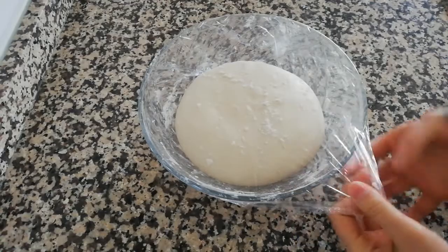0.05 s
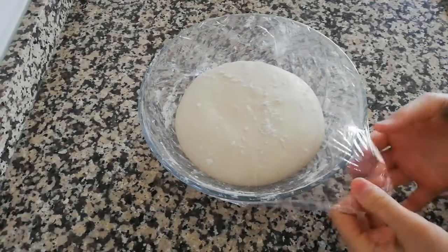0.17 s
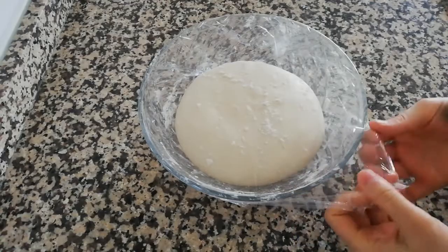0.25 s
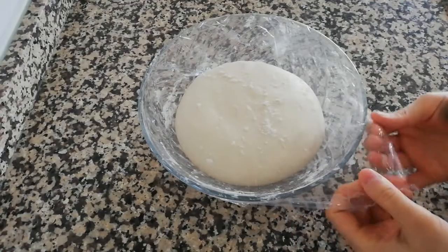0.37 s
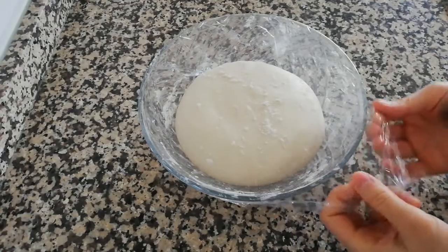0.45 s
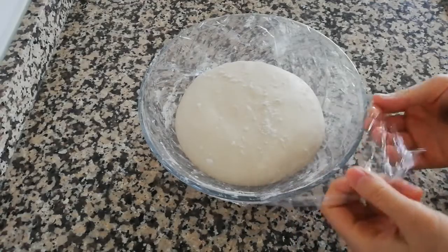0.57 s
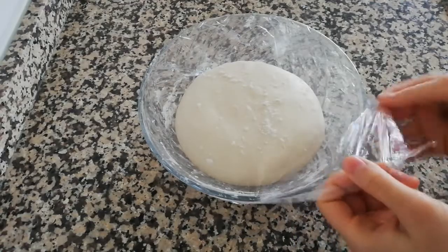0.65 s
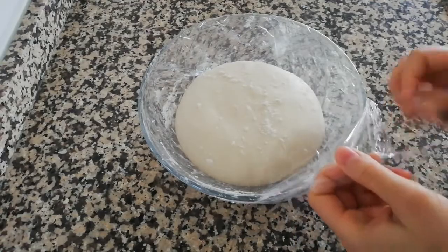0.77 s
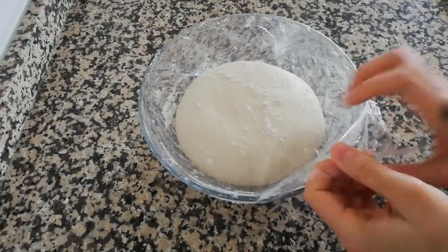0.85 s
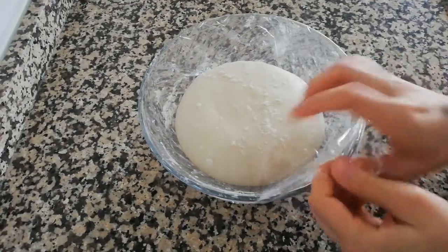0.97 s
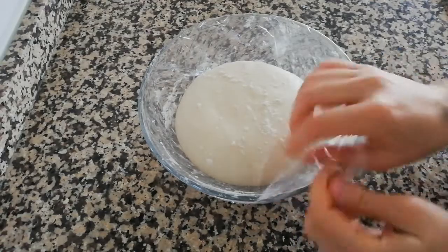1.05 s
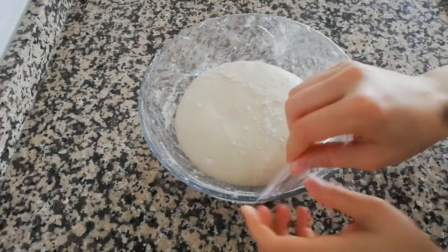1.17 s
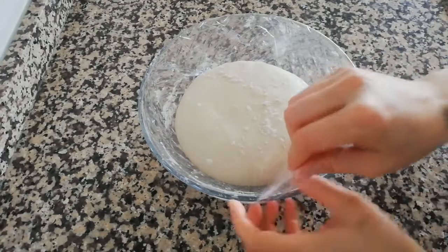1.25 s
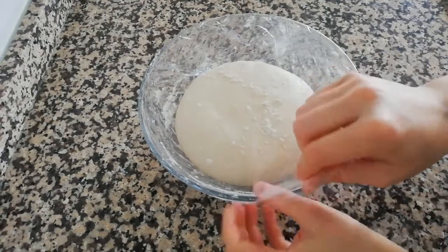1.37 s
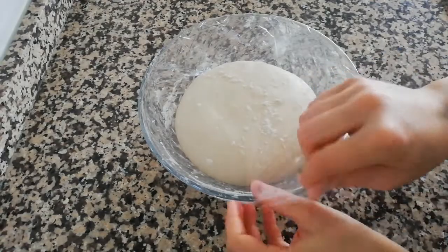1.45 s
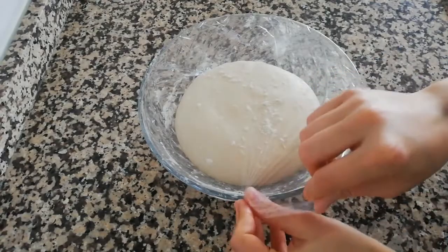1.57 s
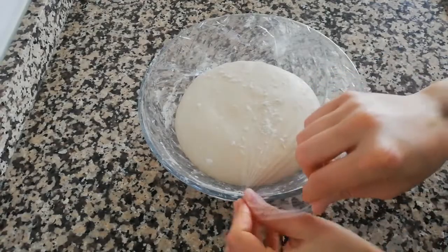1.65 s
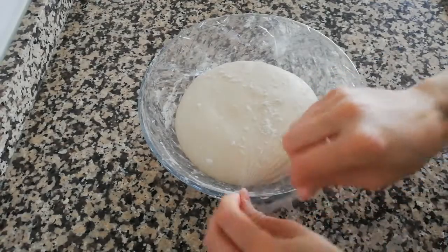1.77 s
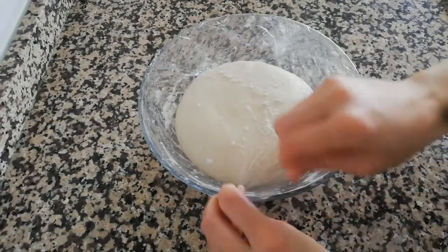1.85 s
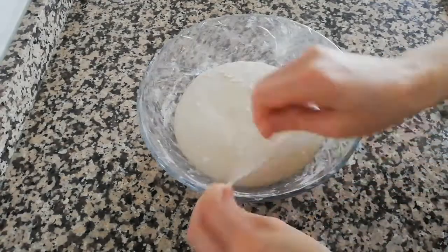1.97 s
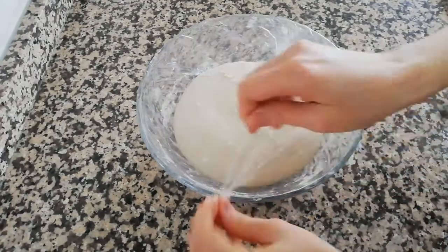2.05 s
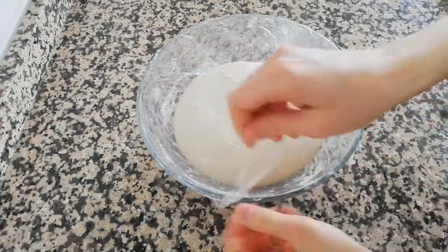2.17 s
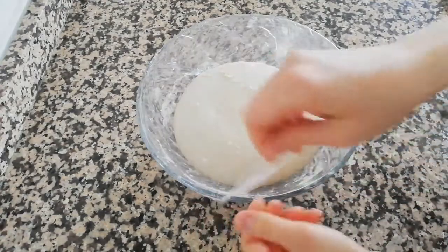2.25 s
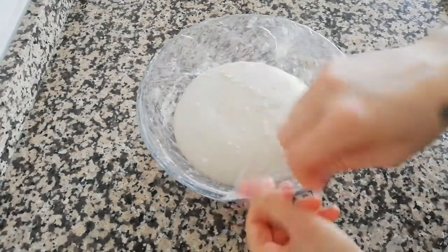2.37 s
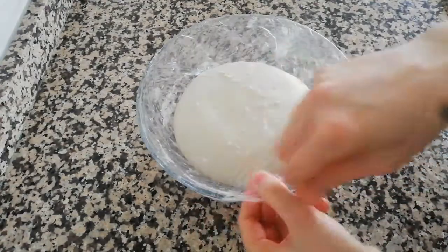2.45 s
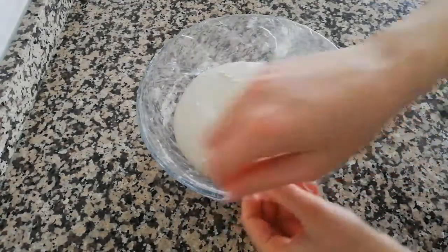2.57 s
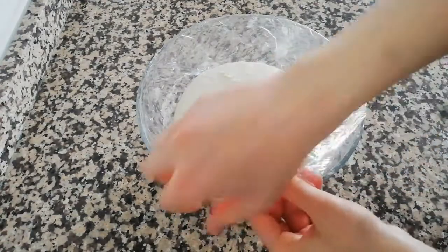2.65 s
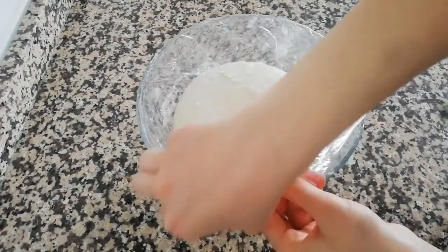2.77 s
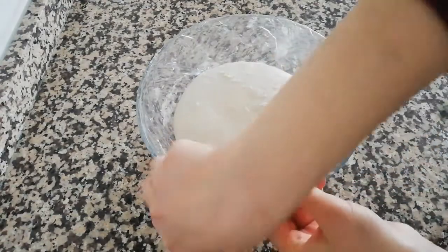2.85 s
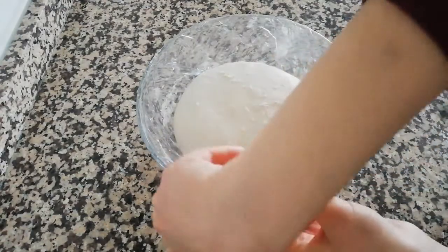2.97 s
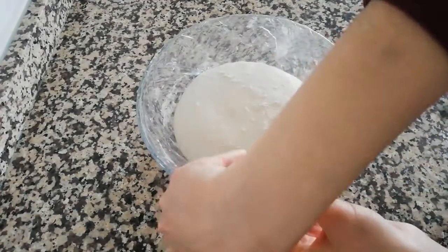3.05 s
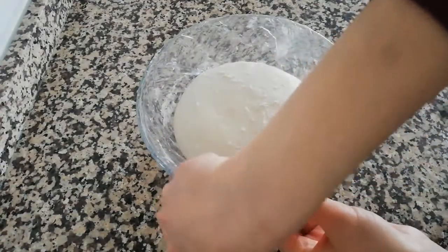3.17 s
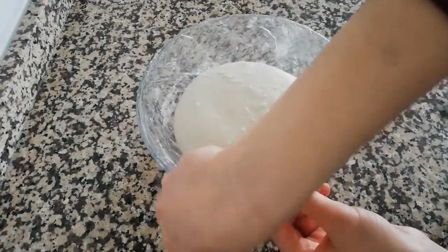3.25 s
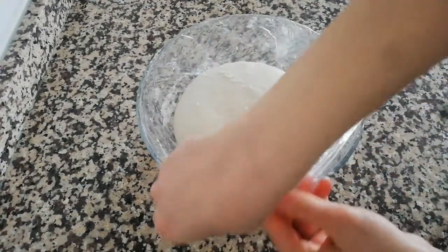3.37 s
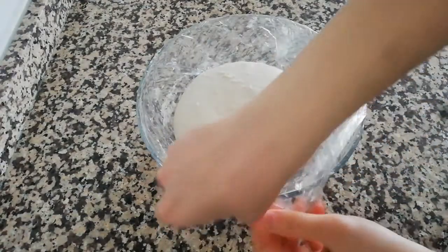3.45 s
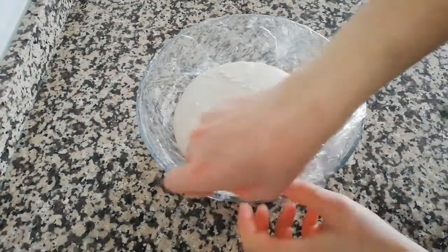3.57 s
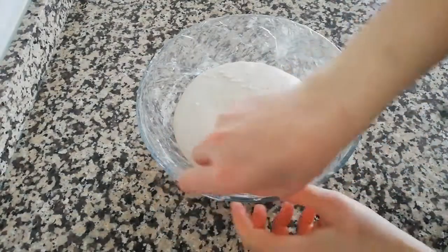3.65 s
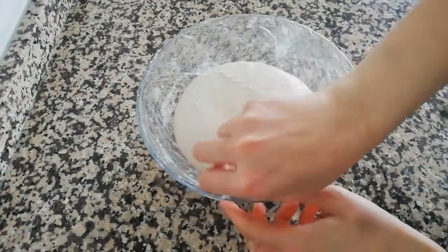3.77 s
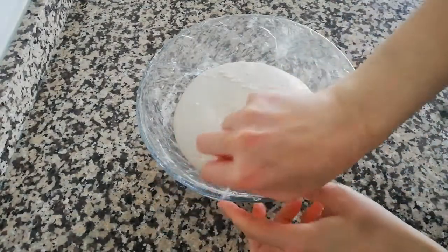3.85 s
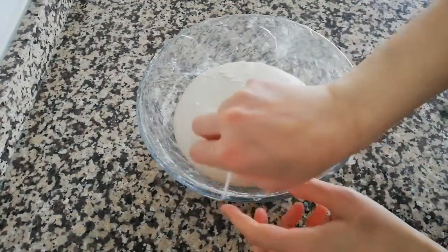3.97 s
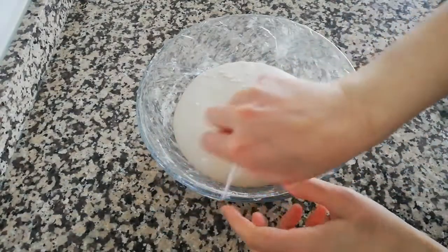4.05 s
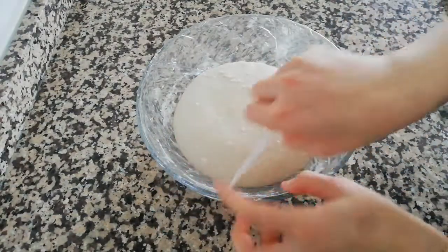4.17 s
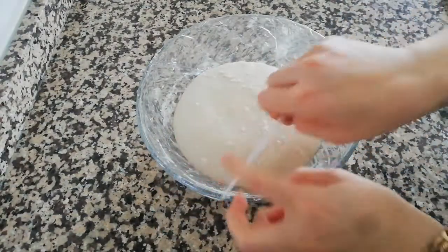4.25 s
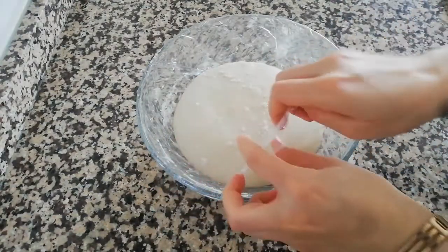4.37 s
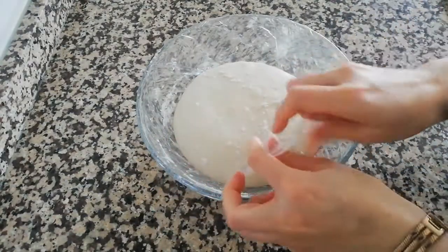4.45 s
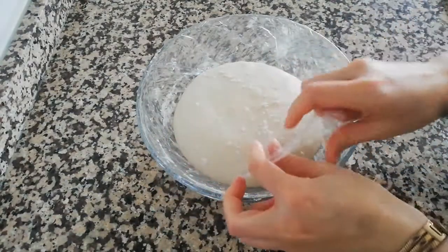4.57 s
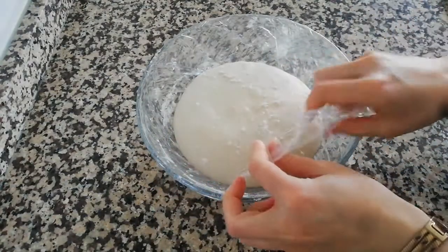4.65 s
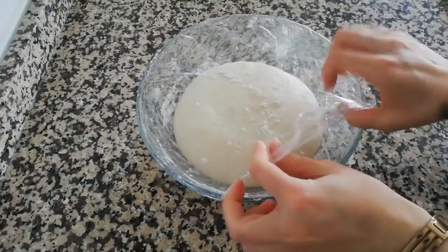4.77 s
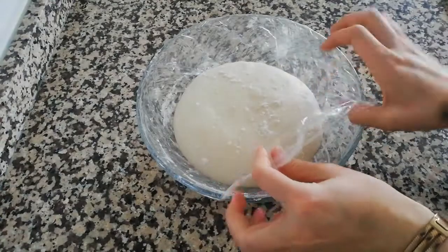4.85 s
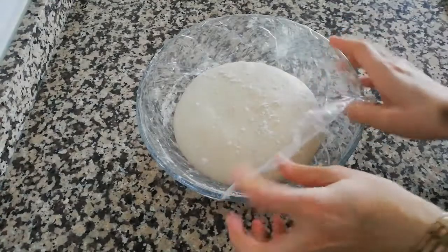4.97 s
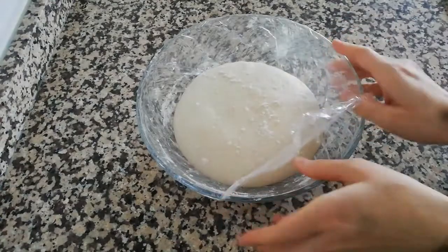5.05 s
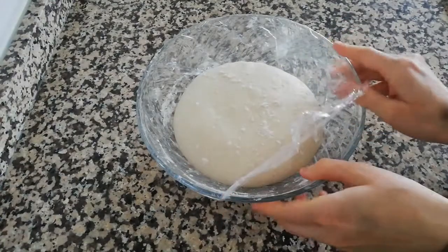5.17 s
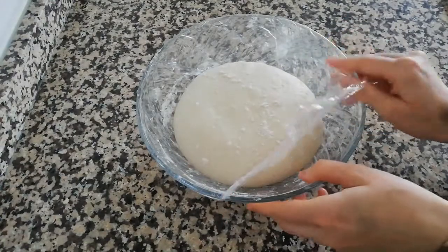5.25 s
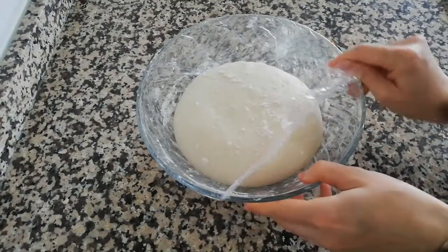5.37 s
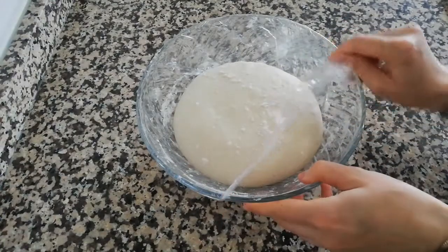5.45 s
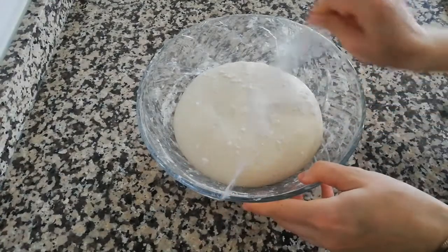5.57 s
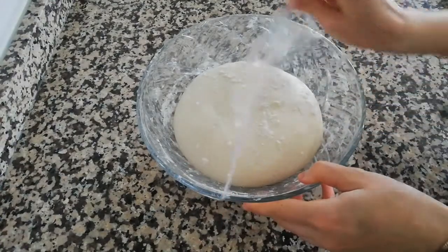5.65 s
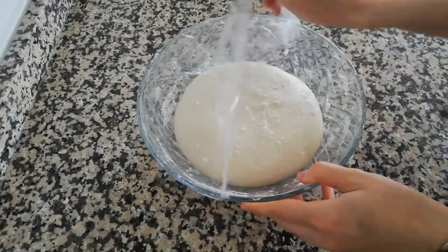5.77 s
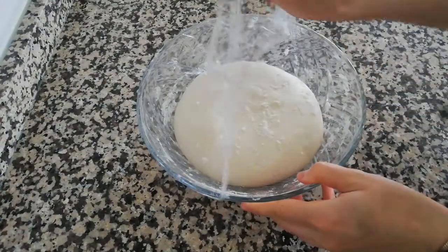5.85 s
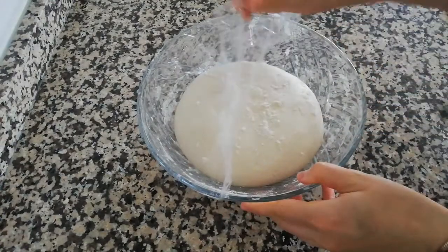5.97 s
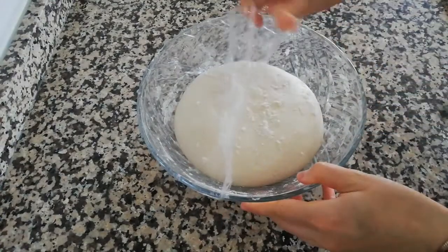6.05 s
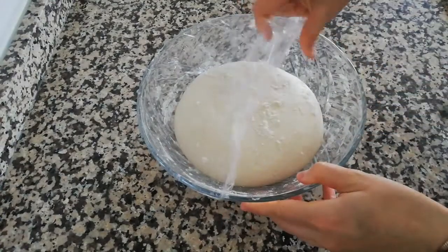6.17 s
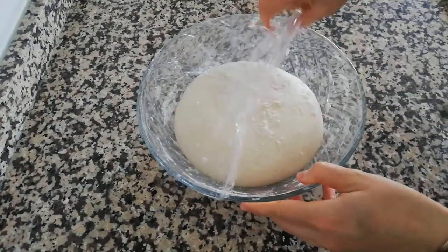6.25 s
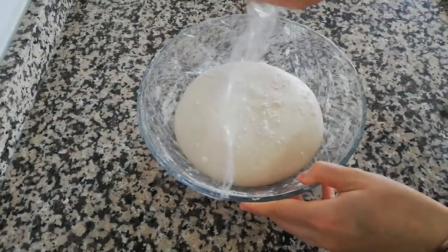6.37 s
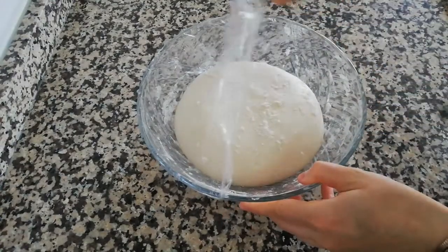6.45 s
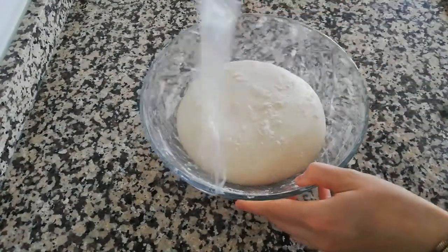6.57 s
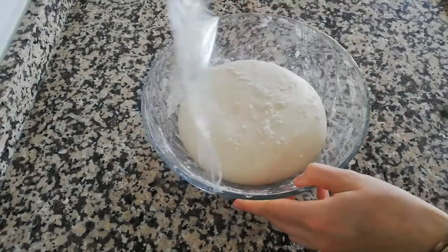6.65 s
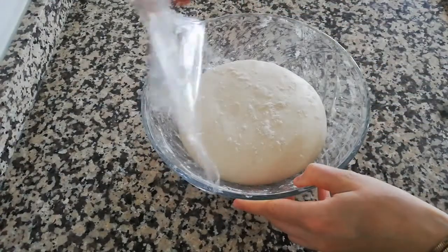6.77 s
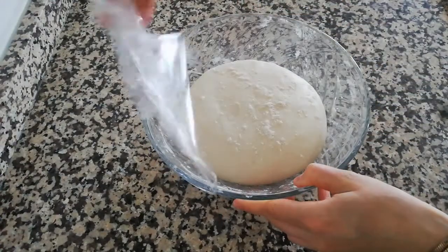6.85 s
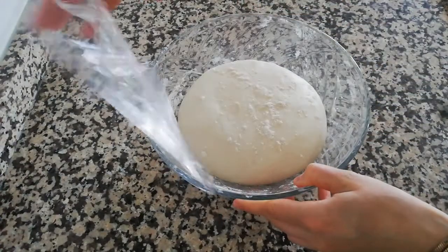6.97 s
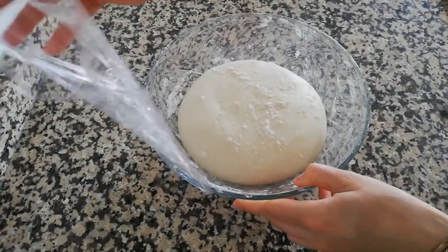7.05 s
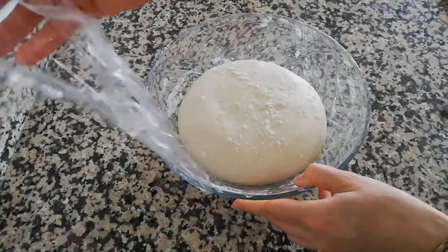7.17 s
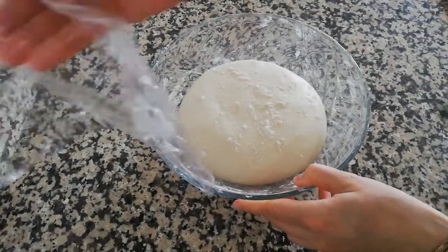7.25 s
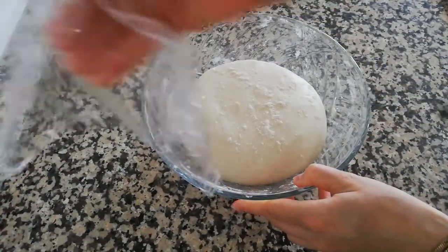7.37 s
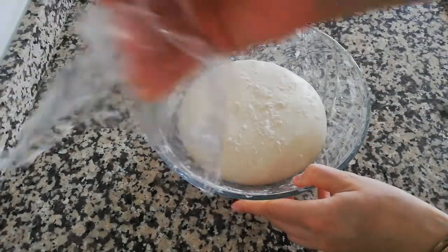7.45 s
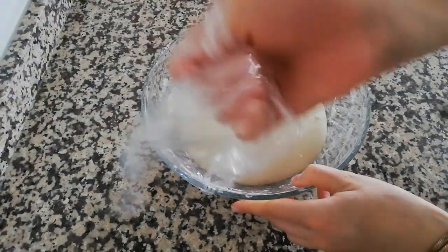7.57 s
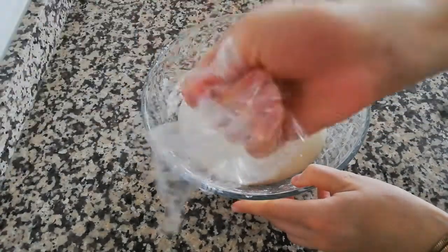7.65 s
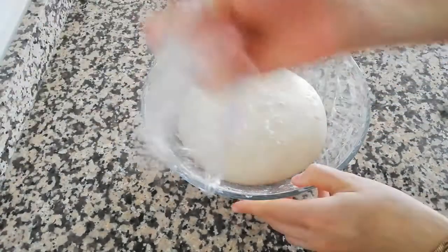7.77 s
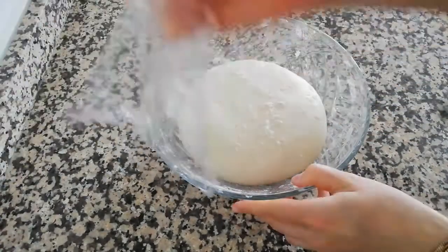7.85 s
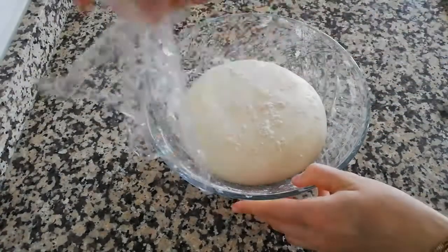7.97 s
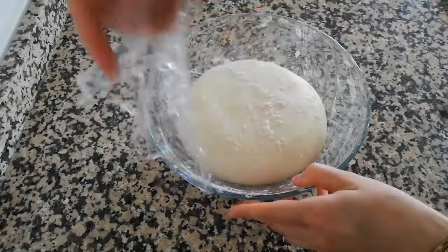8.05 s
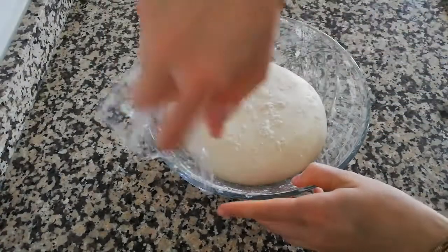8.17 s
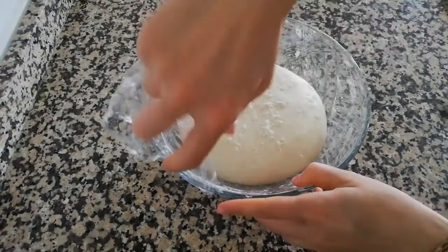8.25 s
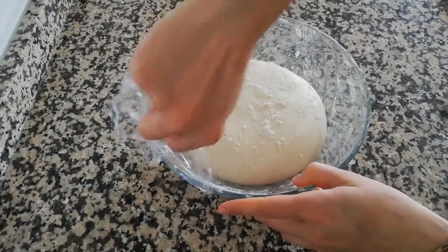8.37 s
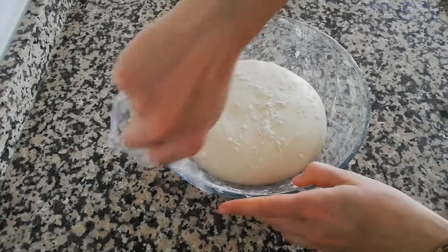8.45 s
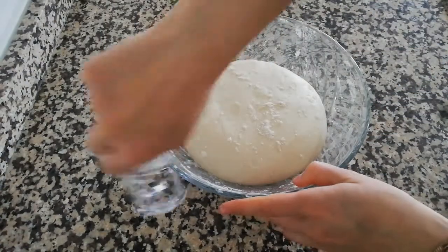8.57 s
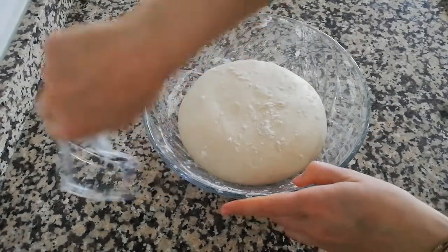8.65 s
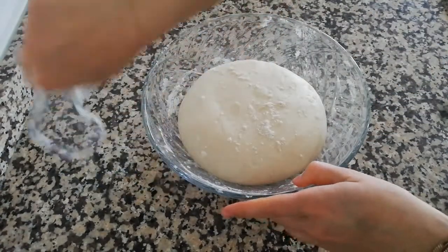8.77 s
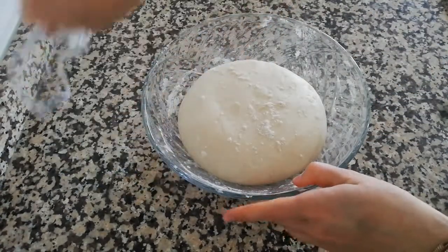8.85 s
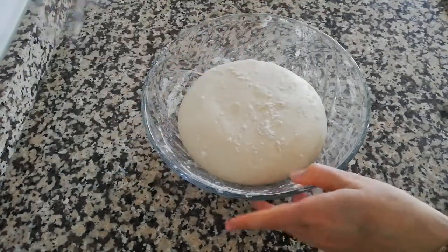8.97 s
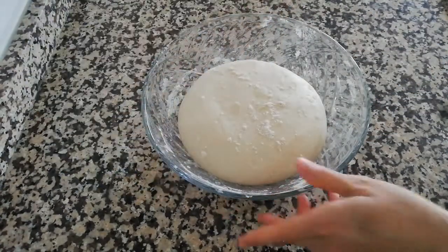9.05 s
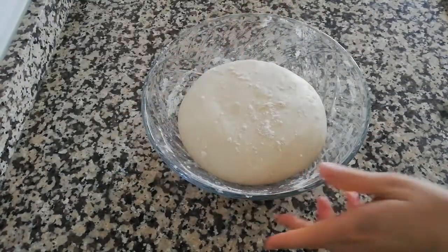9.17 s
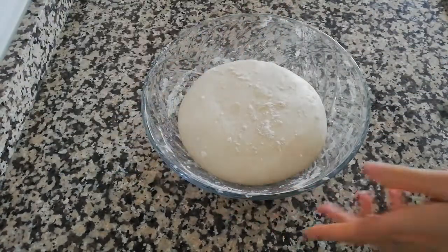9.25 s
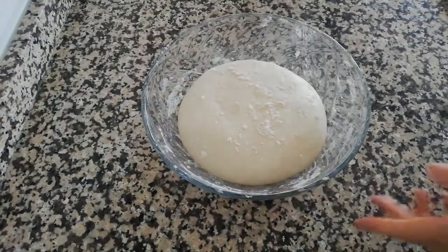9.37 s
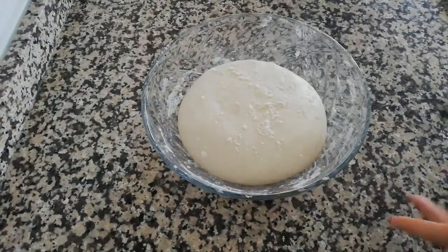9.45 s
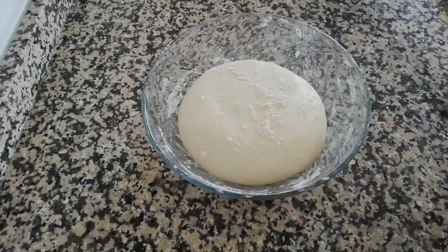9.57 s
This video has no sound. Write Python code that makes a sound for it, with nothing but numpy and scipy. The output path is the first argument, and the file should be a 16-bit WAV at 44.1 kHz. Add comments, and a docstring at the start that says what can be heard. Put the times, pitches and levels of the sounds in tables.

```python
"""Cling film peeled off a glass bowl

Cling film is picked loose from the rim of a bowl, peeled off and gathered in one hand, on a stone counter.
Its creases are many tiny noise clicks and louder single snaps; where it is taut, the sheet drums along.
Fingers rub the rim: uneven noise makes the scrape, wavering sine tones make the glass's faint ring.
Soft noise thuds are knocks of the bowl. Echoes make the small hard room, and an appliance hums in it.
"""
import sys
import numpy as np
from scipy import signal
from scipy.fft import rfft, irfft
from scipy.io import wavfile
from scipy.ndimage import uniform_filter1d

SR = 44100
rng = np.random.default_rng(int(sys.argv[2]) if len(sys.argv) > 2 else 0)


def unload_audio(sound):
    """Save the sound as a 16-bit wav file, at the path given as the first command line argument."""
    columns = np.transpose(np.atleast_2d(sound))
    # keep every value between -1 and 1, then stretch to whole-number steps
    steps = np.round(np.clip(columns, -1, 1) * 32767)
    wavfile.write(sys.argv[1], SR, steps.astype(np.int16))


N = 423801
TIME = np.arange(N) / SR  # seconds


def undb(db):
    """Turn decibels into a plain gain."""
    return 10 ** (np.asarray(db) / 20)


def add(out, sound, s):
    """Mix a short sound in at time s, in seconds."""
    start = max(int(s * SR), 0)
    part = out[..., start:start + sound.shape[-1]]
    part += sound[..., :part.shape[-1]]


def blow(x, db):
    """Give a burst the energy of a hundredth of a second of sound at this level."""
    return x / np.linalg.norm(x) * np.sqrt(2 * SR / 100) * undb(db)


def walk(rate):
    """Random drift in straight lines between points, with this many points per second."""
    knots = rng.standard_normal(int(N / SR * rate) + 2)
    return np.interp(TIME * rate, np.arange(len(knots)), knots)


def convolve(x, response):
    """Pass two channels through a response."""
    return signal.oaconvolve(x, np.atleast_2d(response), axes=-1)[:, :N]


def colour(x, points, size=4096):
    """Shape the tone through (f/Hz, level/dB) points; white noise keeps its overall power."""
    hz, db = np.transpose(points)
    grid = np.linspace(1, SR / 2, size // 2 + 1)
    log_gain = np.log(undb(np.interp(np.log(grid), np.log(hz), db)))
    # the cepstrum gives a filter that starts at once, with no sound ahead of its cause
    cepstrum = irfft(log_gain)
    response = irfft(np.exp(rfft(2 * cepstrum[:size // 2], size)))
    return convolve(x, response / np.linalg.norm(response))


def pair(x, width):
    """Narrow or widen two channels by scaling their difference."""
    mid, side = x[0] + x[1], (x[0] - x[1]) * width
    return np.array([mid + side, mid - side]) / np.sqrt(2 + 2 * width ** 2)


# single snaps and ticks, before the trims in film():
# (t/s, crack level/dB, hollow pop against crack level/dB)
FILM_SNAPS = [(0.0428, -40.5, -4), (0.153, -32, -6.5), (0.346, -29.5, -35), (0.3695, -32, -24),
              (0.385, -31, -17), (0.438, -36.5, -16.5), (0.474, -31, 0.5), (0.5482, -36, -2.5),
              (0.628, -30.5, 2.5), (0.659, -30, -7.5), (0.967, -45.5, -16), (1.5294, -20, -1.5),
              (1.6906, -39, 0), (1.8464, -30, -45), (1.919, -42, -3), (1.9902, -39, -10), (2.02, -41.5, -4),
              (2.048, -40, -5.5), (2.348, -38.5, -14), (2.413, -49.5, -19), (2.479, -49.5, -7),
              (2.604, -53.5, -4), (2.664, -56.5, 2.5), (2.803, -56.5, -17), (3.036, -57, -2),
              (3.074, -56, 3.5), (3.579, -50.5, 1.5), (3.658, -40.5, -40), (3.758, -42.5, -6),
              (3.802, -37, -11), (3.828, -32, 2), (3.961, -34.5, -7), (4.293, -35.5, -13),
              (4.5038, -37, -9), (4.9926, -33, -12.5), (5.0555, -27.5, -19), (5.174, -37, 1),
              (5.3124, -28.5, -3.5), (5.531, -28, -3), (5.581, -30, 0.5), (5.612, -26.5, 2),
              (5.619, -22.5, -0.5), (5.647, -21, 1), (5.671, -19, -0.5), (5.708, -33, -22),
              (6.0231, -28, -2), (6.045, -29.5, -8.5), (6.096, -28, -10), (6.193, -40, -5),
              (6.303, -35.5, 2.5), (6.405, -28.5, -21), (6.532, -35.5, -2), (7.0552, -24.5, -37.5),
              (7.205, -45.5, 3.5), (8.086, -31, -28.5), (8.248, -45, -0.5), (8.488, -24, -18),
              (8.5379, -25, -35), (8.565, -28.5, -31), (9.4434, -45, -9.5)]
# tone of a buckling crease, relative: (f/Hz, level/dB)
CREASE_TONE = [(1200, -19), (2300, -9.5), (3700, -2.5), (7000, -2), (10200, 3), (12500, -0.5), (16000, -13)]
# tone of the taut sheet, relative: (f/Hz, level/dB)
SHEET_TONE = [(80, -19.5), (140, -5), (210, 0), (290, -6), (640, -16), (840, -5), (1300, -1), (1750, -2.5),
              (2200, -13.5), (4000, -19), (7000, -99)]
# a snap of middling level dies away in this time; louder ones are over sooner
SNAP_DB, SNAP_DECAY_MS, SNAP_DB_PER_HALVING = -31.5, 2.9, 24.5
# a small fold pops high; the wider the fold, the stronger and lower its pop
# (the drop is for a pop as loud as its crack)
POP_HZ, POP_DROP_OCTAVES = 3331, 1.15


def film(crease_db=-3.0, sheet_db=-3, twang_db=-7, crack_db=-4.5, pop_db=-4.5):
    """Hand moves crinkle creases, drum the sheet and twang panels; snaps add a bright crack and hollow pop."""
    crease_gain, sheet_gain = hands()
    # between moves the creases relax faintly, most once the film hangs loose
    relax_db = np.interp(TIME, [3.0, 8.7], [-73, -64]) + 5.6 * walk(7.9)
    crease_gain = crease_gain * undb(crease_db) + undb(relax_db)

    # gentle handling gives separate ticks in a soft rustle, a firm pull a dense crackle
    firm = np.clip(crease_gain / undb(-39), .3, .75)
    ticks = crinkle(spread_db=4.6, even_s=.06, count=4000)
    crackle = crinkle(spread_db=-0.5, even_s=0.024, count=15000)
    buckles = np.sqrt(firm) * crackle + np.sqrt(1 - firm) * ticks
    creases = buckles * crease_gain
    sheet = buckles * sheet_gain * undb(sheet_db)
    pops = twangs() * sheet_gain * undb(twang_db)

    for s, db, hollow_db in FILM_SNAPS:
        burst = snap(SNAP_DECAY_MS * 2 ** ((SNAP_DB - db) / SNAP_DB_PER_HALVING))
        hz = POP_HZ * 2 ** (-POP_DROP_OCTAVES * undb(hollow_db))
        # the pop ends steeply below its pitch and trails off gently above
        steep = signal.butter(2, hz / 1.78, "high", fs=SR, output="sos")
        gentle = signal.butter(1, [hz / 1.98, min(hz * 1.44, SR / 3)], "band", fs=SR, output="sos")
        pop = signal.sosfilt(np.vstack([steep, gentle]), burst)
        add(creases, blow(burst, db + crack_db), s)
        add(pops, blow(pop, db + hollow_db + pop_db), s)

    # the film is drawn away to the left, which shows most in the treble
    pan_db = np.interp(TIME, [6.2, 7.2], [.8, 3.2])
    panned = creases * undb(np.array([pan_db, -pan_db]) / 2)
    return colour(panned, CREASE_TONE) + colour(sheet, SHEET_TONE) + pops


# sharp tugs at the edge of the film: (start t/s, length t/s, level/dB)
EDGE_TUGS = [(0, .11, -39.5), (0.167, 0.031, -29.5), (0.292, 0.047, -38), (0.362, 0.1384, -36),
             (0.652, 0.036, -30), (1.027, 0.194, -47), (1.52, 0.24, -45.5), (1.682, 0.28, -47.5),
             (2.012, 0.087, -41), (2.272, 0.12, -44), (3.326, 0.0523, -48.5), (4.148, 0.12, -36),
             (4.388, 0.094, -36), (5.047, 0.07, -36.5), (5.156, 0.033, -36.5), (5.312, 0.0746, -30),
             (5.968, 0.0425, -34), (8.486, 0.0306, -24), (8.54, 0.039, -27.5)]
# a tug bites at once, slackens by the sag over its length and lets go; the sheet drums along
TUG_ATTACK_S, TUG_SAG_DB, TUG_RELEASE_S, TUG_SHEET_DB = 0.002, 8.5, 0.0038, -12
# slow squeezes of loose film that swell and fade:
# (middle t/s, length t/s, level/dB, sheet against creases level/dB)
LOOSE_SQUEEZES = [(1.401, 0.155, -47, -25), (3.661, 0.367, -52, -13), (3.87, 0.14, -33, -8),
                  (4.173, 0.17, -38, -19), (4.365, 0.71, -46, -11), (5.302, 0.132, -40, -10.5),
                  (6.05, 0.11, -31, -11.5), (7.07, 0.32, -48, -10), (7.171, 0.14, -38.5, -9.5),
                  (7.43, 0.602, -49.5, -15.5), (7.877, 0.25, -38, -18), (8.065, 0.13, -36.5, -34),
                  (8.346, 0.37, -45.5, -11), (9.095, 0.15, -45, -14.5), (9.446, 0.84, -59.5, -10.5)]
SQUEEZE_EDGE_DB = 12  # how much quieter a squeeze is at its ends than in its middle
# long pulls that peel the film off the rim, each a list of points, before the lift below:
# (t/s, crinkle level/dB, drumming sheet against crinkle level/dB)
LONG_PEELS = [
    [(5.41, -51, -10), (5.455, -37, -12), (5.54, -33.5, -9.5), (5.568, -38, -6), (5.585, -32.5, -8),
     (5.615, -28.5, -6.5), (5.64, -37.5, 5.5), (5.70, -51.5, -14), (5.728, -32, -12), (5.83, -35.5, -8.5),
     (5.866, -53.5, -11), (5.95, -43, -12)],
    [(6.24, -55, -11.5), (6.308, -36, 1), (6.355, -49, -9), (6.374, -36, -5.5), (6.42, -37.5, -8),
     (6.55, -37.5, -7), (6.8, -35, -14.5), (6.9, -37.5, -15.5), (7.004, -38.5, -20), (7.03, -49, -22)],
]
# lift of the peels, and how unevenly the film clings and lets go
PEEL_DB, CLING_DB, CLINGS_PER_S = 2, 2.6, 70


def hands():
    """How hard tugs, squeezes and peels work the creases and the sheet, as two gains over time."""
    moves = []
    for start, length, db in EDGE_TUGS:
        t = np.maximum(TIME - start, 0)
        bite = np.minimum(t / TUG_ATTACK_S, 1)
        let_go = np.exp(-np.maximum(t - length, 0) / TUG_RELEASE_S)
        tug = bite * let_go * undb(db - TUG_SAG_DB * t / length)
        moves.append((tug, TUG_SHEET_DB))
    for middle, length, db, sheet_db in LOOSE_SQUEEZES:
        from_middle = 2 * (TIME - middle) / length
        moves.append((undb(db - SQUEEZE_EDGE_DB * from_middle ** 2), sheet_db))
    for peel in LONG_PEELS:
        s, db, sheet_db = np.transpose(peel)
        pull_db = np.interp(TIME, s, db) + PEEL_DB + CLING_DB * walk(CLINGS_PER_S)
        pull = undb(pull_db) * (TIME > s[0]) * (TIME < s[-1])
        moves.append((pull, np.interp(TIME, s, sheet_db)))
    # moves that overlap add up in power
    creases = sum(gain ** 2 for gain, _ in moves)
    sheet = sum((gain * undb(sheet_db)) ** 2 for gain, sheet_db in moves)
    return np.sqrt(creases), np.sqrt(sheet)


def crinkle(spread_db, even_s, count, bunch_db=3.5):
    """Creases buckle at random moments, with unequal sizes and in little runs."""
    grains = clicks(decay_ms=1.0, lag_ms=0.1605, scatter=1.0, count=count)
    sizes = undb(spread_db * np.minimum(rng.exponential(size=count), 4.0))
    out = np.zeros((2, N))
    for s, grain in zip(rng.uniform(0, N / SR, count), grains * sizes[:, None, None]):
        add(out, grain, s)
    out *= undb(bunch_db * walk(110))
    # the hand feeds in strain steadily, so a big buckle leaves less for its neighbours
    power = uniform_filter1d(np.mean(out ** 2, axis=0), int(even_s * SR))
    return out / np.sqrt(power + 1e-9)


def snap(decay_ms, give_ms=0.84, count=30):
    """A fold gives way and sets off a quick run of smaller buckles that builds up and fades."""
    grains = clicks(decay_ms=0.87, lag_ms=0.1623, scatter=0.66, count=count)
    gaps = rng.uniform(.06, .3, count)
    delays_ms = np.cumsum(gaps) * decay_ms
    fade = np.exp(-delays_ms / decay_ms)
    build_up = 1 - np.exp(-delays_ms / give_ms)
    sizes = fade * build_up * undb(2.0 * rng.standard_normal(count))
    out = np.zeros((2, SR // 8))
    for ms, grain in zip(delays_ms - delays_ms[0], grains * sizes[:, None, None]):
        add(out, grain, ms / 1000)
    return out


def clicks(decay_ms, lag_ms, scatter, count, tint_db=2.0, fold_db=5.5, size=256):
    """Tiny buckles: fading noise, each with its own tone and spot, radiating differently to each side."""
    ms = np.arange(size) / SR * 1000
    band = np.linspace(0, 1, size // 2 + 1)  # 0 is the lowest pitch, 1 the highest
    noise = rng.standard_normal((3, count, size))
    shared, left, right = rfft(noise * np.exp(-ms / decay_ms))
    lag = rng.uniform(-lag_ms, lag_ms, (count, 1)) / ms[1]
    # the far ear hears the buckle a few samples later
    left = scatter * left + shared * np.exp(-1j * np.pi * band * np.maximum(lag, 0))
    right = scatter * right + shared * np.exp(-1j * np.pi * band * np.maximum(-lag, 0))
    # the tint sets the middle of the band against both ends; the fold is a row of broad resonances
    tint = tint_db * rng.standard_normal((count, 1, 1)) * np.cos(2 * np.pi * band)
    ripples = rng.uniform(2.93, 8.97, (count, 1, 1))
    fold = fold_db * np.cos(2 * np.pi * (ripples * band + rng.random((count, 1, 1))))
    both = irfft(np.stack([left, right], axis=1) * undb(tint + fold))
    return both / np.sqrt(np.sum(both ** 2, axis=(1, 2), keepdims=True))


def twangs(low_hz=800, high_hz=1800, cycles=3.1, spread_db=4.5, count=4000):
    """Small taut panels between the creases flick over one by one, each ringing briefly at its own pitch."""
    t = TIME[:SR // 50]
    out = np.zeros((2, N))
    for when, pitch, size, turn in rng.random((count, 4)):
        turns = low_hz * (high_hz / low_hz) ** pitch * t
        side_turns = (turn - .5) * np.array([[.5], [0]])  # the two sides swing out of step
        ring = np.sin(2 * np.pi * (turns + side_turns)) * np.exp(-turns / cycles)
        # a few panels are much louder than the rest
        add(out, ring * undb(-spread_db * np.log(max(size, .03))), when * N / SR)
    return out / np.std(out)


# the uneven grip makes rubbed notes stutter in level and waver in pitch
STUTTER_DB, WOBBLE_TURNS, WOBBLES_PER_S = 3.5, .17, 130
# a stretched fold creaks faintly: (t/s, length t/s, level/dB, f/Hz)
FOLD_CREAKS = [(7.543, 0.106, -49.5, 2570), (9.53, 0.0536, -56, 1640)]


def creaks(sharpness=9.4):
    """Two layers of film slide over each other; their uneven slips ring a stretched fold."""
    out = np.zeros((2, N))
    for s, length, db, hz in FOLD_CREAKS:
        press = np.sqrt(np.hanning(int(length * SR)))
        stutter = undb(STUTTER_DB * walk(WOBBLES_PER_S)[:len(press)])
        slips = press * rng.standard_normal((2, len(press))) * stutter
        ringing = signal.lfilter(*signal.iirpeak(hz, sharpness, fs=SR), slips)
        add(out, blow(ringing, db), s)
    return out


# bending modes of the glass bowl, relative: (f/Hz, level/dB)
BOWL_MODES = [(610, 3.5), (1238, -2), (2032, -2), (3022, -8), (4165, 2), (5490, -5), (6930, 4)]
# film and fingers catching and slipping on the rim:
# (t/s, length t/s, ring level/dB, strongest f/Hz, fall away from it level/dB per octave)
RIM_RUBS = [(2.218, 0.012, -54, 3600, 4), (2.247, 0.03, -45, 1200, 4), (3.258, 0.11, -55, 4165, 25),
            (3.305, 0.096, -53, 3060, 22)]


def bowl(ring_s=0.15, scrape_db=-2, slip_db=5):
    """Skin sticks and slips on the rim with a grainy scrape and sets the glass singing; the hand damps it."""
    t = TIME[:SR // 2]
    rings, scrapes = np.zeros((2, 2, N))
    fade = np.exp(-np.log(1000) * t / ring_s)  # down 60 dB after ring_s
    for s, length, db, hz_best, focus_db in RIM_RUBS:
        press = np.sqrt(np.hanning(int(length * SR)))
        swell = signal.fftconvolve(press, fade)[:len(t)]
        ring = 0
        for hz, mode_db in BOWL_MODES:
            fall_db = focus_db * np.abs(np.log2(hz / hz_best))
            stutter_db = STUTTER_DB * walk(WOBBLES_PER_S)[:len(t)]
            ring = ring + undb(mode_db - fall_db + stutter_db) * waver(hz, t)
        slips = press * rng.standard_normal((2, len(press))) * undb(slip_db * walk(403)[:len(press)])
        add(rings, blow(ring * swell, db), s)
        add(scrapes, blow(slips, db + scrape_db), s)
    return rings + colour(scrapes, [(350, -14), (720, -6.5), (1400, -20), (9000, -15.5)])


def waver(hz, t):
    """A note of sticking and slipping, unsteady in pitch and a little different on each side."""
    wobble = WOBBLE_TURNS * walk(WOBBLES_PER_S)[:len(t)]
    start = rng.random() + rng.random((2, 1)) / 4
    return np.sin(2 * np.pi * (hz * t + wobble + start))


# soft knocks of a hand on the bowl, before toning and fading: (t/s, level/dB)
BOWL_KNOCKS = [(.667, -49.5), (0.824, -54), (1.925, -53), (5.765, -39), (7.16, -49), (8.49, -42.5)]


def knocks(decay_s=0.056):
    """Dull, short thuds of the bowl on the stone, as fading low noise."""
    t = TIME[:SR // 4]
    out = np.zeros((2, N))
    for s, db in BOWL_KNOCKS:
        add(out, rng.standard_normal((2, len(t))) * np.exp(-t / decay_s) * undb(db), s)
    return colour(pair(out, width=0.6), [(70, -30.5), (210, 6.5), (330, -7), (800, -11.0), (3000, -40)])


def kitchen(x, t60_s=0.41, wet_db=-10.5, early_db=-7, early_s=0.011, hollow_hz=835, hollow_s=0.083, hollow_db=3):
    """Quick echoes from counter and bowl, the hollow note of the air in the bowl, then the room's tail."""
    t = TIME[:SR * 2 // 3]
    near, far = rng.standard_normal((2, 2, len(t)))
    early = near * np.exp(-t / early_s) * (t > .0012)
    # the near echoes reach both sides alike in the bass and differently in the treble
    bass = signal.lfilter(*signal.butter(1, 1800, fs=SR), early)
    early = early - bass + bass[0]
    tail = far * np.exp(-np.log(1000) * t / t60_s) * (t > .007)
    tail = signal.lfilter(*signal.butter(1, 8000, fs=SR), tail)  # softer treble
    hollow = np.sin(2 * np.pi * hollow_hz * t) * np.exp(-t / hollow_s) * 2 / (hollow_s * SR)
    echoes = undb(early_db) * early / np.linalg.norm(early[0])
    echoes = echoes + undb(wet_db) * tail / np.linalg.norm(tail[0])
    return x + convolve(x, echoes + undb(hollow_db) * hollow)


# appliance hum, each tone wavering around its level: (f/Hz, level/dB)
HUM_TONES = [(96.8, -66), (145.2, -67.5)]
# tone of the still kitchen air, relative: (f/Hz, level/dB)
AIR_TONE = [(200, -7), (500, -13.5), (1300, -2.5), (2500, -12), (9000, -26), (16000, -45)]


def background(air_db=-69, rumble_db=-57, drone_db=-69.0):
    """A motor's humming sine tones and its rumble, the faint hiss of the room and its low note, as noise."""
    hum = 0
    for hz, db in HUM_TONES:
        tone = np.sqrt(2) * np.sin(2 * np.pi * (hz * TIME + rng.random()))
        hum = hum + undb(db + 2.0 * walk(13.0)) * tone
    air = colour(rng.standard_normal((2, N)), AIR_TONE)
    rumble = colour(pair(rng.standard_normal((2, N)), width=0.84),
                    [(20, -21.0), (44, -2.5), (75, -15.5), (180, -19.0), (400, -38.5)])
    # the low note of the room itself
    drone = colour(pair(rng.standard_normal((2, N)), width=0.9),
                   [(100, -26.0), (220, 0), (320, -6.0), (700, -20.5), (2000, -67.5)])
    return hum + undb(air_db) * air + undb(rumble_db) * rumble + undb(drone_db) * drone


def scene():
    """Film and bowl sound in the kitchen, over its background."""
    return kitchen(film() + creaks() + bowl() + knocks()) + background()


def record(dry, left_hz=9700, right_hz=11200, left_db=3, right_db=-3, sharpness=5.5, alike_hz=165, top_hz=16000):
    """Two close ports share the bass and ring in the treble; the recorder rounds peaks and cuts the top."""
    low = signal.butter(2, alike_hz, fs=SR, output="sos")
    side = signal.sosfiltfilt(low, (dry[0] - dry[1]) / 2)
    sound = dry - np.array([side, -side])  # the bass is now the same on both sides
    left = signal.lfilter(*signal.iirpeak(left_hz, sharpness, fs=SR), sound[0]) * undb(left_db)
    right = signal.lfilter(*signal.iirpeak(right_hz, sharpness, fs=SR), sound[1]) * undb(right_db)
    heard = np.tanh(sound + np.array([left, right]))
    return signal.sosfilt(signal.ellip(10, .2, 70, top_hz, fs=SR, output="sos"), heard)


dry = scene()
out = record(dry)
unload_audio(out)
```